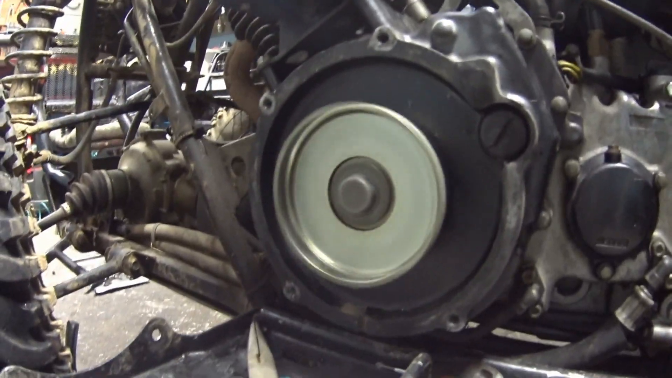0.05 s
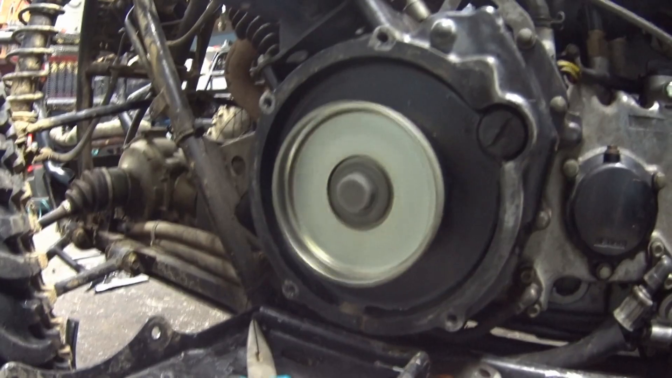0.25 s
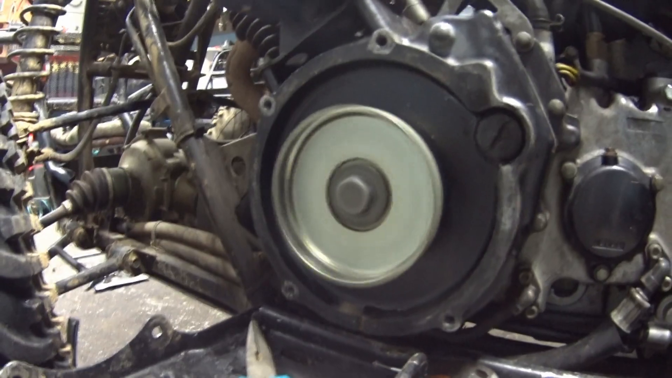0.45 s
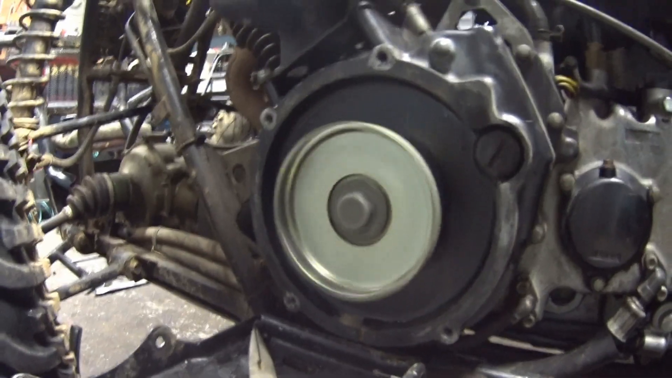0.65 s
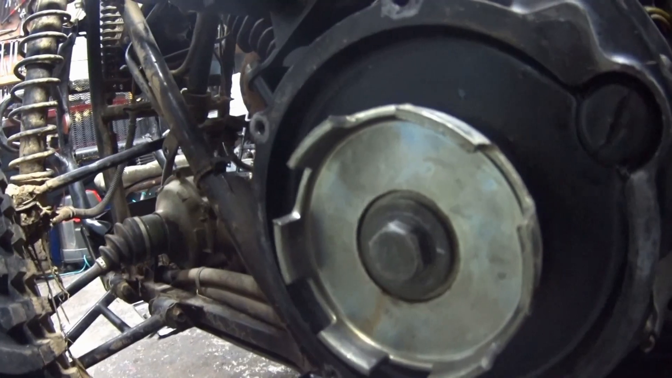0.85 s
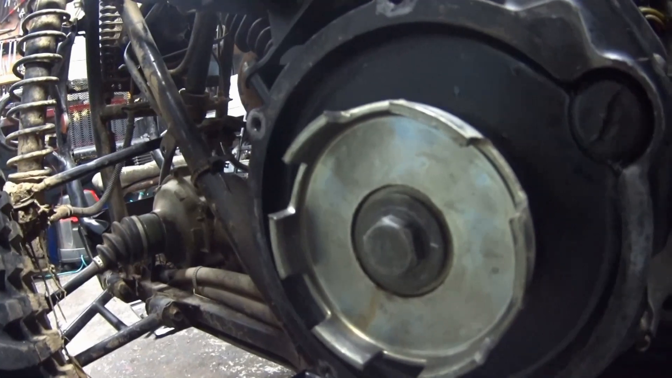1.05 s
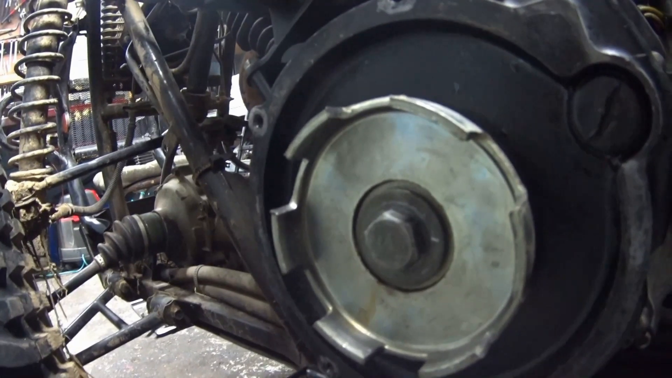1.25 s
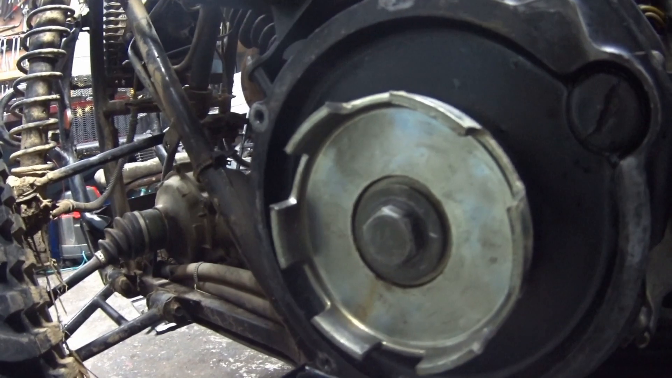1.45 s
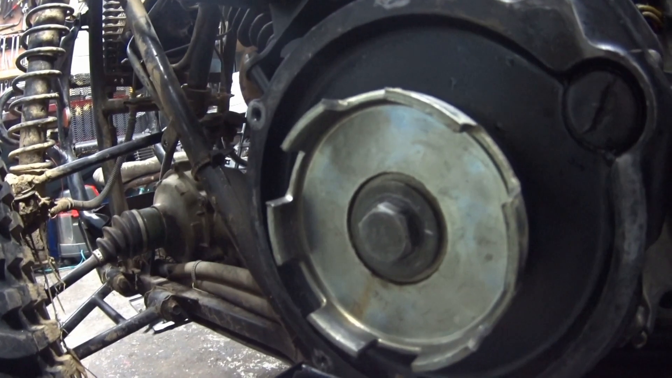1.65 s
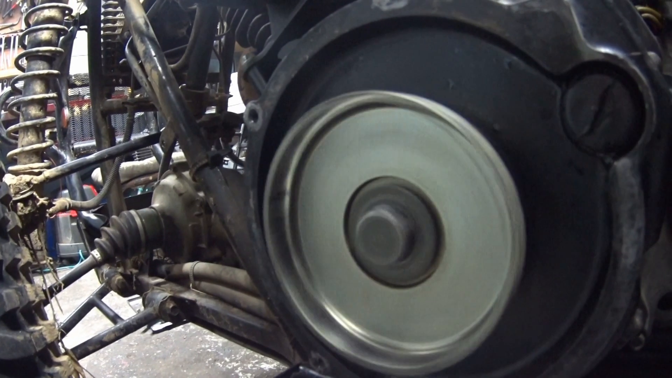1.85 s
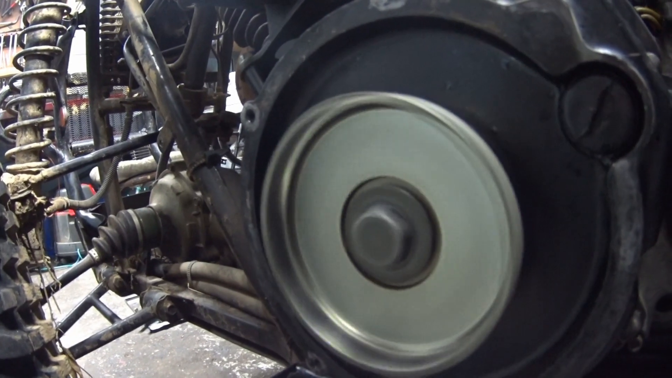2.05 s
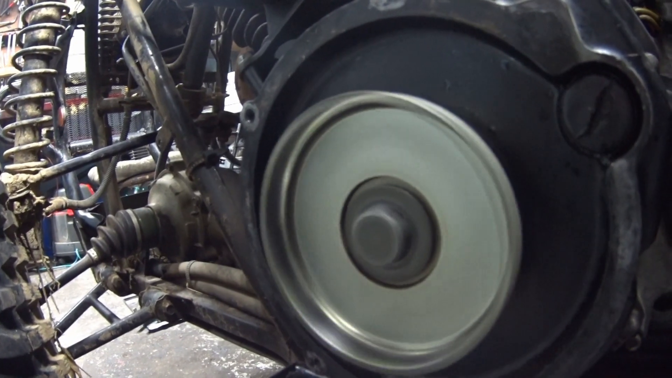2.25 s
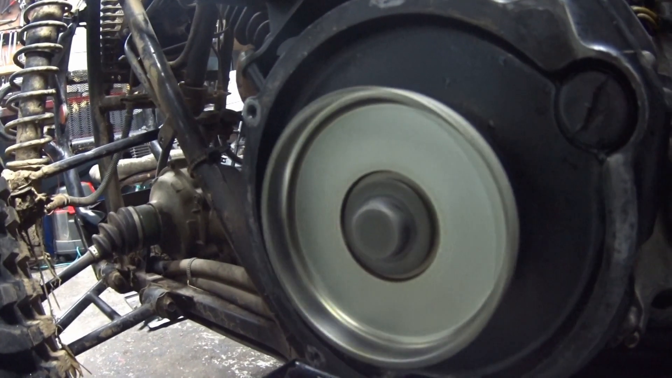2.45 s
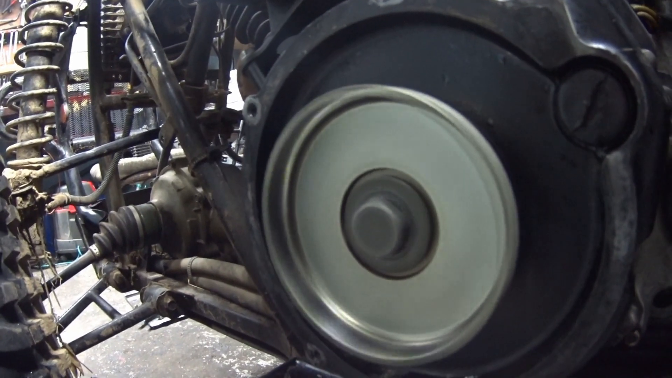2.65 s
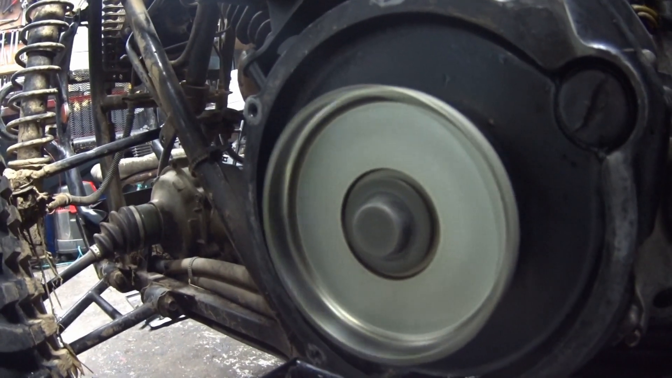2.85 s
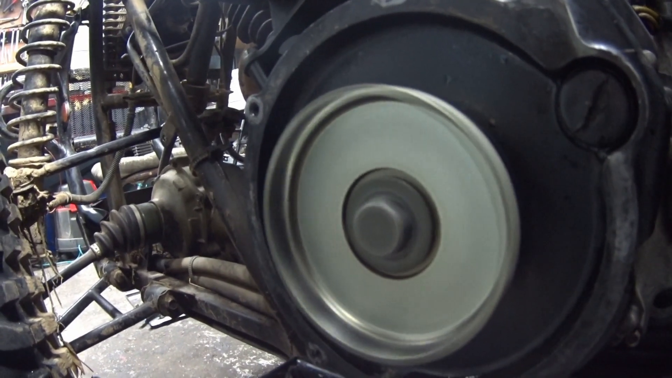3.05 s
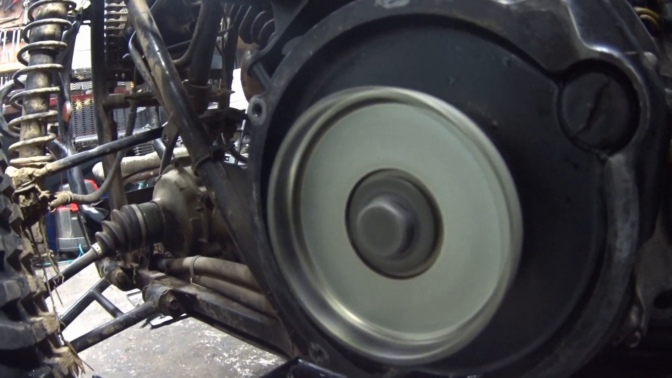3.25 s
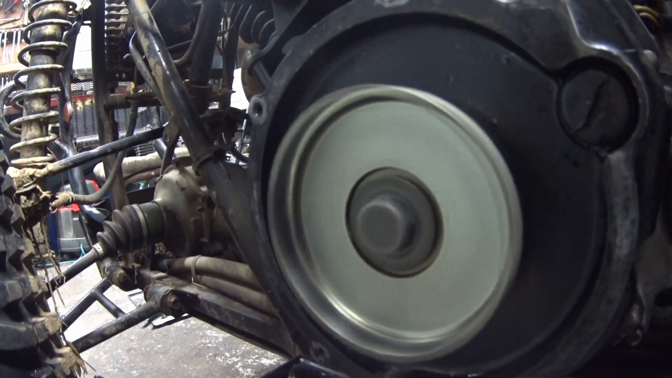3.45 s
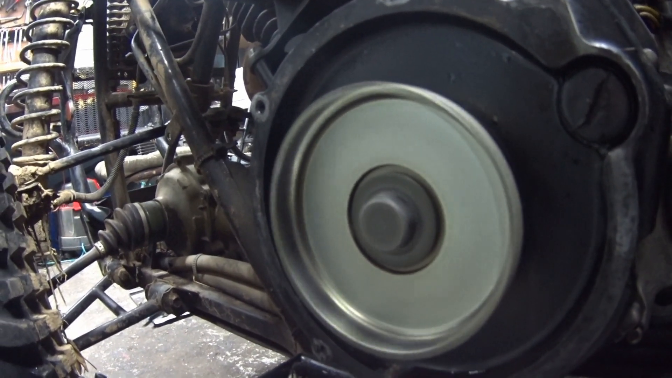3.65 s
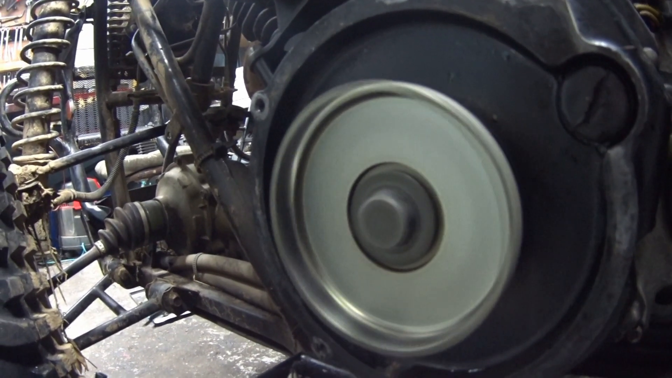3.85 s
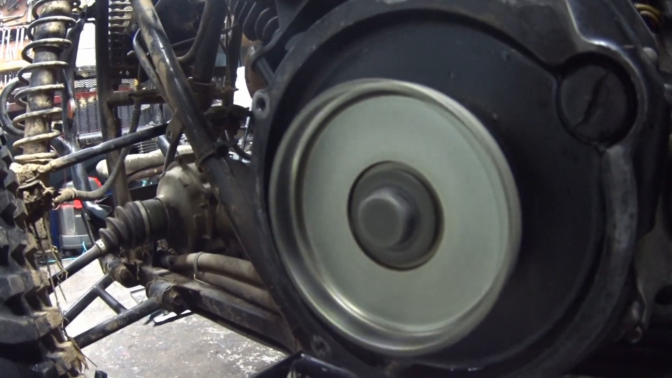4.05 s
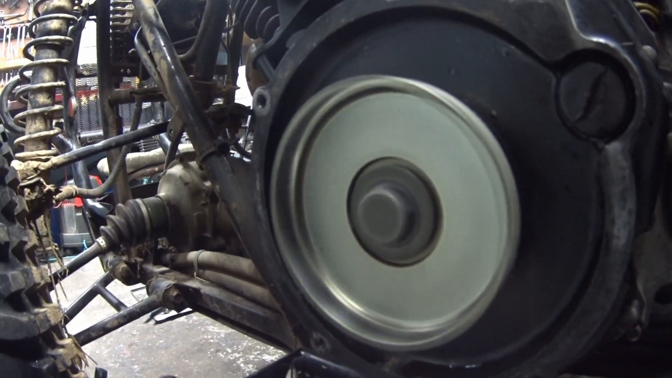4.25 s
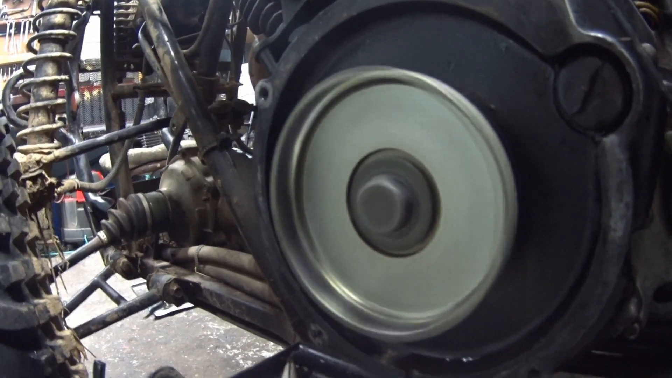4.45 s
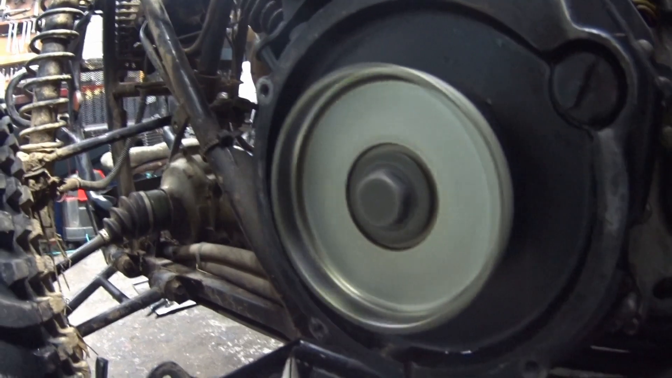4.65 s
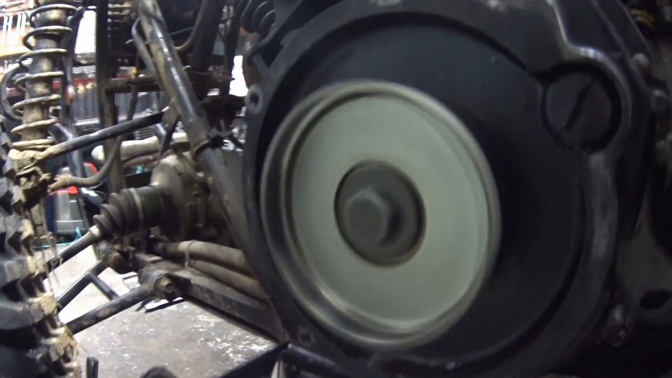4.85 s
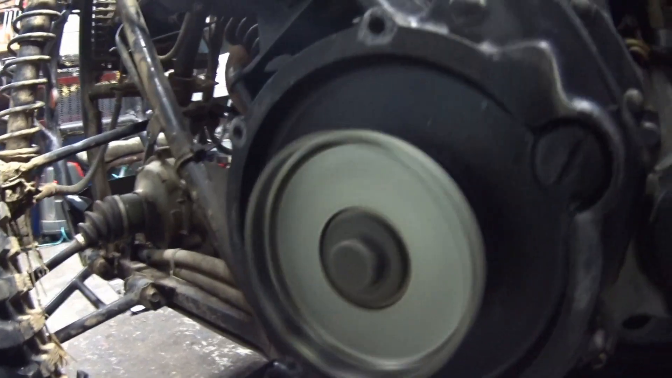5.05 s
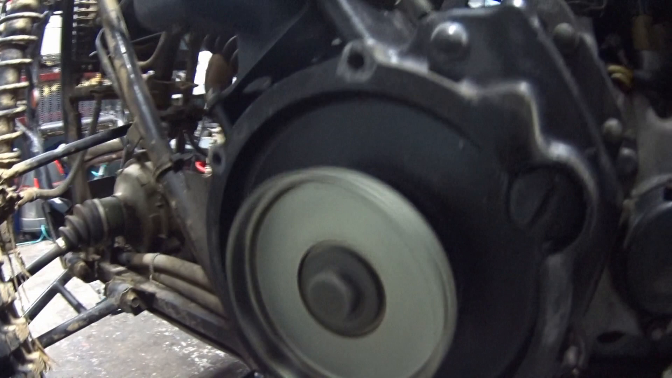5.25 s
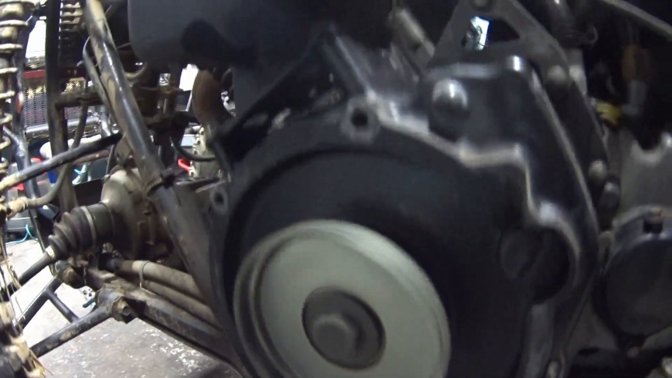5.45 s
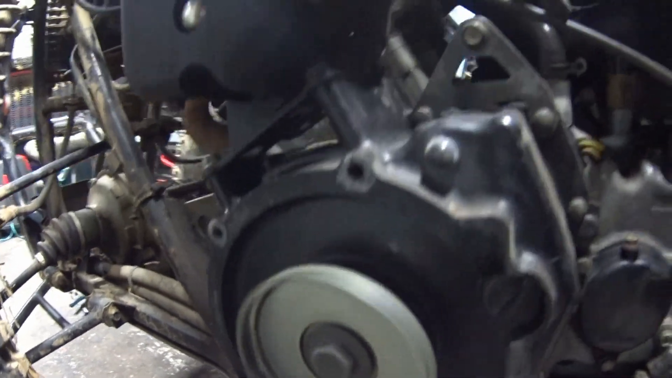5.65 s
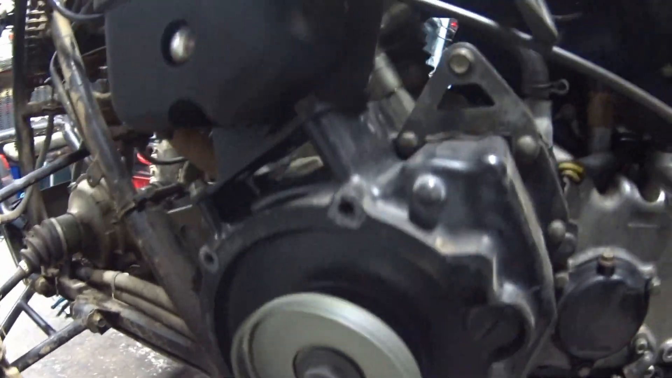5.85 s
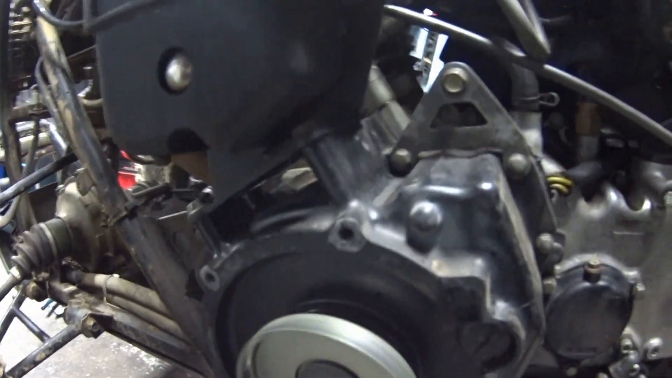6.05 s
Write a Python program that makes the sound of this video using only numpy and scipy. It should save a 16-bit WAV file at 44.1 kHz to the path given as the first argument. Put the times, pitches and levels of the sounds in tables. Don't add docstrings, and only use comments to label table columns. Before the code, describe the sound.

A single-cylinder engine idles in a garage, cuts out, clicks and wind, then a harsh starter grinds, the engine catches and clattering idle swells back.

```python
import sys
import numpy as np
from scipy import signal
from scipy.fft import rfft, irfft, next_fast_len
from scipy.io import wavfile
from scipy.ndimage import uniform_filter1d

SR = 44100
rng = np.random.default_rng(int(sys.argv[2]) if len(sys.argv) > 2 else 0)


def wav_out(sig):
    wavfile.write(sys.argv[1], SR, np.round(np.clip(np.atleast_2d(sig).T, -1, 1) * 32767).astype(np.int16))


def gain_from_db(level_db):
    decades = np.asarray(level_db, float) / 20
    return 10 ** decades


N = 269451
T = np.arange(N) / SR
HZ = np.fft.rfftfreq(next_fast_len(N), 1 / SR)

CUT_S, RESUME_S = .7395, .781
PULL_S, MESH_S, UNLOAD_S, RELEASE_S = 1.803, 1.817, 2.5, 3.155
# t/s, level/dB, sign
JUMPS = [
    (.98025, -24, 1),
    (1.78295, -20, -1),
]

# f/Hz, density/dB per Hz
AIR = [(150, -24), (250, -21), (302, -38), (349, -22.5), (679, -26), (783, -24), (1240, -28), (4420, -35),
       (4860, -35), (11100, -44.5), (14400, -85), (22000, -120)]
AIR_DB = -55
# t/s, level/dB
CLICKS = [
    (0.846, -25),
    (1.042, -36.5),
]
# f/Hz, level/dB, t60/s
CLICK_RINGS = [
    [(776, -20, 0.34), (1413, -5.5, 0.15), (2900, -11, .06), (3330, -4, 0.13), (5200, -18, 0.088),
     (6681, -12, 0.068), (7600, -8, 0.063), (8870, -16, .05)],
    [(1230, -2.5, 0.25), (1550, -6, 0.18), (1900, 2, 0.2), (2320, -1.5, 0.29), (3600, -7, 0.1),
     (4450, -8, 0.18), (5200, -14, 0.072), (8400, -11, 0.055)],
]

# f/Hz, density/dB per Hz
GUST = [(12, -42.5), (20, 0), (53, -1), (69, -2.5), (82, -6.5), (92, -6), (185, -25), (500, -30.5),
        (650, -90), (1100, -120)]
# t/s, level/dB, sign, size/s
EDDIES = [(0.8257, -16.5, -1, 0.0062), (0.853, -22, 0.83, 0.0076), (0.919, -17, -0.88, 0.0057),
          (1.065, -19.5, 0.96, .003), (1.142, -21, -0.87, 0.0017), (1.31, -28, -0.77, 0.005),
          (1.34, -20, 1, 0.0049), (1.4704, -8, -0.62, .0014), (1.474, -12, 0.87, 0.0036)]
# t/s, extra level/dB
PUFFS = [(1.035, 2), (1.3, 2), (1.41, 4.5), (1.475, 5.5), (1.655, 3), (1.765, 5)]
WIND_DB, SURGE_DB, SURGE_S, PUFF_S = -31.5, 5, .015, .022
DRIFT_S = .0012

# f/Hz, likeness
LIKENESS = [(60, .96), (170, .96), (480, .86), (1340, .85), (3770, .86), (10600, .86)]
# f/Hz, left lead/rad
LEAD = [(0, 0), (1030, 0.7), (2580, 0.3), (2840, -0.1), (3620, 0.6), (3960, 0.4), (7240, -0.0),
        (10800, -0.0)]
# f/Hz, left-right level/dB
LEAN = [(60, -3.5), (140, -1.5), (340, -7.5), (800, -4.5), (1890, -2), (4490, -1.0), (10600, 0)]

# f/Hz, density/dB per Hz
GRIND = [(320, -21), (550, -12.5), (1200, -4), (1360, -5.5), (1860, -3), (2080, -14), (2300, -8),
         (2650, -1.5), (2780, 0.5), (4540, -9.5), (5620, -11.5), (8400, -7), (11100, -22), (14400, -56.5),
         (22000, -120)]
# f/Hz, width/Hz, level/dB
HOUSING = [(1900, 320, 13), (2290, 170, 7.5), (2830, 42, -24.5), (3150, 140, 8.5), (3820, 160, 7.5),
           (5460, 45, -10), (7340, 130, -24.5), (8800, 250, -21)]
# t/s, peak level/dB, ring f/Hz, ring level/dB
SLIPS = [(1.9994, -28, 2270, -4), (2.4774, -6.5, 2500, -13), (2.531, -3.5, 2760, 3),
         (2.5894, 0.5, 1790, -12), (2.65, -1.5, 2760, -15), (2.6934, -9, 2750, -8),
         (2.725, -2.5, 2880, -24), (2.774, -2, 2800, -12), (2.8196, -3.5, 1640, 7), (2.8394, -10, 2840, 4),
         (2.892, -8, 2830, 7), (2.907, -7, 1913, 8.5), (2.941, -7.5, 3140, 3), (2.964, -7.5, 1900, 12),
         (2.9884, -3, 2820, -1), (3.032, -0.5, 2830, -12), (3.068, -5.5, 1940, -15), (3.086, -4, 2840, -13),
         (3.138, -15, 3870, -24), (3.1398, -10, 2840, -1), (3.187, -7.5, 2640, -55)]
# length/s, f/Hz, width/Hz, level/dB
LURCH = [
    (.13, 110, 160, -36),
    (.15, 480, 300, -31),
    (.023, 5600, 900, -24),
]
# t/s, length/s, start f/Hz, end f/Hz, level/dB
WHINES = [
    (1.84, .06, 780, 700, -26),
    (1.85, .11, 1450, 1950, -22),
    (1.97, .06, 2400, 2280, -21),
    (1.97, .06, 1250, 1180, -26),
    (3.09, .07, 1400, 1900, -26),
]
SQUEAKS = [(1.9, .03, 8200, 8100, -30), (1.96, .04, 9400, 8900, -32), (2.05, .08, 7300, 7250, -32),
           (2.96, .04, 7900, 8150, -35), (2.985, .03, 8600, 8600, -28), (3.06, .03, 8550, 8500, -27),
           (3.09, .04, 8600, 8600, -28), (3.08, .07, 7700, 7800, -33)]
HUMS = [
    (2.05, 1.12, 392, 392, -38),
    (2.98, .22, 7180, 7200, -37),
    (3.05, .36, 5230, 5190, -46),
]
WHINE_SHARE, SQUEAK_SHARE, HUM_SHARE, MIN_WIDTH_HZ = .055, .017, .004, 8
PULL_DB, GRIND_DB, UNLOAD_DB_PER_S, COAST_DB, COAST_DB_PER_S = -39, -15.5, -17.5, -32, -80

CUP_HZ, CUP_WIDTH_HZ = 2840, 28
WARM_CUP_DB, CUP_DB, CUP_AWAY_DB_PER_S = 7, 5.5, -2.5

# t/s, rate/firings per s
SPEED = [(2.05, 10.45), (2.33, 7.65), (2.84, 8.6), (2.98, 6.32), (3.08, 9.78), (3.43, 7.62), (3.75, 9.82),
         (3.84, 7.92), (4.11, 8.63), (4.41, 8.69), (4.9, 7.62), (4.97, 8.54), (5.47, 8.89), (5.5, 8.21),
         (5.81, 9.28), (6.1, 8.94)]
CATCH_S = SPEED[0][0]
WARM_START_S, WARM_PER_S = -.112, 8.6
# t/s, level/dB
GAIN = [
    (0, -18),
    (.74, -17.5),
    (2.03, -24.5),
    (3.2, -27.5),
    (3.6, -24.5),
    (4.7, -23),
    (5.6, -18.5),
    (6.11, -18),
]
BLOW_DB, DRAG_DB_PER_S, BOOM_DB, WARM_BOOM_DB = 4.5, -7, -11.5, -8
HANG_S, HANG_WIDTH_S = .026, .012

# f/Hz, density/dB per Hz
CASING = [(260, -2.5), (450, -3), (664, -2.5), (801, -1.5), (1090, -6.5), (1350, -4.5), (2220, -8),
          (2790, -2.5), (3150, -7.5), (3550, -10.5), (4050, -12.5), (5160, -18.5), (8030, -15.5),
          (11100, -26.5), (14400, -60), (22000, -120)]
# place/share of cycle, f/Hz, width/Hz, level/dB, t60/s
KNOCKS = [(-.22, 2510, 310, 7, 0.025), (-0.136, 8350, 3500, -6, 0.032), (-.13, 4840, 2700, -7.5, 0.0346),
          (.15, 7000, 4900, -5.5, 0.031), (.16, 3980, 1500, -8, 0.049), (0.118, 1290, 340, -6, 0.051),
          (.08, 2220, 1150, -6, 0.058), (-.14, 860, 730, -8, 0.064), (0.476, 4240, 840, -6.5, 0.067),
          (.48, 9140, 2000, -7.5, 0.046), (.47, 5900, 2520, -7.5, 0.037), (.64, 5100, 3000, -10, .03),
          (0.564, 813, 300, -2, 0.053), (.58, 1250, 470, -4, 0.054), (0.547, 1950, 1050, -2.5, 0.038),
          (0.624, 2280, 1370, -1.5, 0.05)]
# f/Hz, width/Hz, level/dB
COVER = [(1383, 38, -20), (1707, 210, -17.5), (7240, 28, -58.5), (7940, 350, -29)]
LIFT_DB, FREED_LIFT_DB, FREED_S = -1.23, 7.5, .4
LULL_PLACE, LULL_S, LULL_SHARE = .39, .0087, .3

# f/Hz, density/dB per Hz
FRAME = [(12, -40), (22, -2), (50, -3), (90, -3), (160, -6), (290, -9), (420, -15), (600, -19), (800, -45),
         (1300, -120)]
# delay/s, level/dB, rise/s, t60/s
PIPE = [(-.0165, 8.5, 0.019, 0.087), (-0.0117, -1.5, 0.0087, 0.13), (-.0125, -6.5, 0.0041, 0.086),
        (-.0125, -15.5, 0.012, 0.17), (.011, -5.5, 0.0053, 0.11), (.017, 2, 0.0047, 0.043),
        (-0.017, -16, 0.025, 0.14), (-0.018, -20, 0.0034, 0.1), (-.0125, -29, 0.0013, 0.086)]
AIRBOX = (0.0324, 7.4, 0.0086, 0.17)
PIPE_HZ = [163, 82, 327, 390, 245, 200, 53, 607, 719, 104]


def evened(x):
    return x / np.sqrt(np.mean(x ** 2) + 1e-20)


def noise(*shape):
    return rng.standard_normal(shape)


def read(points, hz):
    f, value = np.transpose(points)
    return np.interp(np.log(hz + 1), np.log(f + 1), value)


def curve(rows):
    return np.interp(T, *np.transpose(rows))


def bump(x):
    return np.exp(-.5 * x ** 2)


def shaped(x, gain):
    size = next_fast_len(N)
    return irfft(rfft(x, size) * gain, size)[:N]


def colour(x, points):
    return evened(shaped(x, gain_from_db(read(points, HZ))))


def resonate(x, hz, width_hz):
    r = np.exp(-np.pi * abs(width_hz) / SR)
    return evened(signal.lfilter([1, 0, -1], [1, -2 * r * np.cos(2 * np.pi * hz / SR), r * r], x))


def glide(x, hz, width_hz):
    turn = np.exp(2j * np.pi * np.cumsum(hz) / SR)
    r = np.exp(-np.pi * abs(width_hz) / SR)
    return evened((turn * signal.lfilter([1 - r], [1, -r], x / turn)).real)


def blows(times_s, db):
    at = np.round(np.asarray(times_s) * SR).astype(int)
    out = np.zeros(N + 2 * SR)
    np.add.at(out, at + SR, gain_from_db(db))
    return out


def play(train, shape):
    return signal.oaconvolve(train, shape)[SR:SR + N]


def fade(rise_s, t60_s):
    t = T[:SR // 3]
    return (1 - np.exp(-t / abs(rise_s))) * gain_from_db(-60 * t / abs(t60_s))


def grit(per_s, spread_db):
    size = gain_from_db(spread_db * np.minimum(rng.exponential(1, (2, N)), 5))
    size *= rng.random((2, N)) < per_s / SR
    return evened(size * rng.choice([-1., 1.], (2, N)))


def garage():
    a, b = noise(2, N)
    air = gain_from_db(AIR_DB) * np.array([colour(a, AIR), colour(.5 * a + .87 * b, AIR)])
    for (s, db), rings in zip(CLICKS, CLICK_RINGS):
        for hz, ring_db, t60_s in rings:
            train = blows([s, s + .05], [db + ring_db, db + ring_db - 19.5])
            gate = play(train, fade(.0038, t60_s)[:SR // 4])
            air += gate * np.array([resonate(x, hz, .03 * hz) for x in (a, .8 * a + .6 * b)])
        gate = play(blows([s], db - 9), fade(.003, .088))
        air += gate * np.array([resonate(x, 2500, 5000) for x in (b, .8 * b + .6 * a)])
    return air


def wind():
    a, b = (colour(x, GUST) for x in noise(2, N))
    db = WIND_DB + SURGE_DB * np.exp(-abs(T - RESUME_S) / SURGE_S)
    db += sum(puff_db * bump((T - s) / PUFF_S) for s, puff_db in PUFFS)
    level = gain_from_db(db) * np.interp(T, [1.8, 1.9], [1, .16])
    lumps = np.zeros(N)
    for s, eddy_db, sign, size_s in EDDIES:
        u = (T - s) / size_s
        lumps += sign * gain_from_db(eddy_db) * (1 - u ** 2) * bump(u)
    left = level * a + lumps
    later = np.roll(.96 * level * a + lumps, round(DRIFT_S * SR))
    return np.array([left, later + .33 * level * b]) * (T > CUT_S)


def cup(x):
    runs = evened(uniform_filter1d(noise(N), size=500))
    ring = resonate(x * gain_from_db(3.2 * np.clip(runs, -2, 2)), CUP_HZ, CUP_WIDTH_HZ)
    return np.array([ring, np.roll(ring, SR // 50)])


def grind_level():
    held = GRIND_DB + UNLOAD_DB_PER_S * np.maximum(T - UNLOAD_S, 0)
    coast = COAST_DB + COAST_DB_PER_S * (T - RELEASE_S)
    mesh = np.clip((T - MESH_S) / .003, 0, 1)
    free = np.clip((T - RELEASE_S) / .03, 0, 1)
    db = PULL_DB + mesh * (held - PULL_DB) + free * (coast - held)
    return gain_from_db(db) * np.clip((T - PULL_S) / .005, 0, 1)


def pitched():
    rows = [(MESH_S, length_s, hz, hz, width_hz, db) for length_s, hz, width_hz, db in LURCH]
    for table, share in [(WHINES, WHINE_SHARE), (SQUEAKS, SQUEAK_SHARE), (HUMS, HUM_SHARE)]:
        for s, length_s, hz0, hz1, db in table:
            rows.append((s, length_s, hz0, hz1, max(share * hz0, MIN_WIDTH_HZ), db))
    return rows


def starter(drive):
    slip_s, slip_db = np.transpose(SLIPS)[:2]
    level = np.hypot(grind_level(), play(blows(slip_s, slip_db - 8), fade(.0024, .091)))
    level *= gain_from_db(1.5 * evened(uniform_filter1d(noise(N), size=700)))
    swirl = [gain_from_db(4 * evened(uniform_filter1d(v, size=1500))) for v in noise(len(HOUSING), N)]
    out = []
    for x in drive:
        tones = sum(gain_from_db(db) * g * resonate(x, hz, w) for g, (hz, w, db) in zip(swirl, HOUSING))
        grind = level * (gain_from_db(-3.5) * colour(x, GRIND) + gain_from_db(-8) * evened(tones))
        for s, db, hz, ring_db in SLIPS:
            start = round(s * SR)
            span = slice(start, start + SR // 3)
            grind[span] += gain_from_db(db + ring_db - 20.5) * fade(.0044, .1) * resonate(x[span], hz, 100)
        for s, length_s, hz0, hz1, width_hz, db in pitched():
            end_s = s + length_s
            span = slice(round(s * SR), round(end_s * SR))
            hz = np.interp(T[span], [s, end_s], [hz0, hz1])
            grind[span] += gain_from_db(db) * signal.windows.tukey(len(hz), .3) * glide(x[span], hz, width_hz)
        out.append(grind)
    return out + gain_from_db(-37) * cup(out[0])


def firings():
    warm = np.arange(WARM_START_S, CUT_S, 1 / WARM_PER_S)
    turns = np.cumsum(curve(SPEED) * (T >= CATCH_S)) / SR
    caught = T[np.searchsorted(turns, np.arange(int(turns[-1]) + 1), "right")]
    s = np.append(warm, caught)
    drag_db = DRAG_DB_PER_S * (s - CATCH_S) * (s > MESH_S) * (s < RELEASE_S)
    blow_db = np.interp(s, *np.transpose(GAIN)) + BLOW_DB + drag_db
    return s, blow_db, blow_db + np.where(s < CUT_S, WARM_BOOM_DB, BOOM_DB)


def clatter(drive):
    s = firings()[0]
    s = np.append(s, s[-1] + .115)
    cycle_s = np.clip(np.diff(s, append=s[-1] + .11), .1, .135)
    jolts = noise(len(s), len(KNOCKS), 2) * [.002, 2.]

    dip = bump(T[:SR // 10] / LULL_S - 3)
    lull = 1 - LULL_SHARE * play(blows(s + LULL_PLACE * cycle_s - 3 * LULL_S, 0 * s), dip)
    out = gain_from_db(-6.5) * lull * np.array([colour(x, CASING) for x in drive])
    for k, (place, hz, width_hz, db, t60_s) in enumerate(KNOCKS):
        train = blows(s + place * cycle_s + jolts[:, k, 0], db + jolts[:, k, 1])
        gate = play(train, fade(.004, t60_s)[:SR // 10])
        out += gate * np.array([resonate(resonate(x, hz, width_hz), hz, 2 * width_hz) for x in drive])
    out += sum(gain_from_db(db) * np.array([resonate(x, hz, w) for x in out]) for hz, w, db in COVER)

    struck = .55 + play(blows(s + .61 * cycle_s, 3 + 2 * jolts[:, 0, 1]), fade(.003, .2))
    freed = np.exp(-abs(T - RELEASE_S) / FREED_S) * (T > RELEASE_S)
    lift = gain_from_db(LIFT_DB + FREED_LIFT_DB * freed) - 1
    out += lift * signal.sosfilt(signal.butter(2, 3600, "high", fs=SR, output="sos"), out)
    cup_db = np.where(T < CUT_S, WARM_CUP_DB, CUP_DB + CUP_AWAY_DB_PER_S * (T - RELEASE_S))
    level = gain_from_db(curve(GAIN)) * ((T < 1) | (T > 2.03))
    return level * (evened(out) + gain_from_db(cup_db - 14) * cup(out[0] * struck))


def exhaust():
    s, blow_db, boom_db = firings()
    t = T[:SR // 3]
    out = play(blows(s - .016, blow_db - 12), fade(.01, .42)) * colour(noise(N), FRAME)
    levels_db = [blow_db] * len(PIPE) + [boom_db]
    for hz, (delay_s, db, rise_s, t60_s), level_db in zip(PIPE_HZ, [*PIPE, AIRBOX], levels_db):
        late_s = .04 / hz * noise(len(s))
        train = blows(s + delay_s + late_s, level_db + db + noise(len(s)) + 6)
        out += play(train, fade(rise_s, t60_s) * np.sin(2 * np.pi * hz * t))
    return out


def ports(direct, diffuse):
    same = np.clip(read(LIKENESS, HZ), 0, 1)
    tilt = gain_from_db(read(LEAN, HZ) / 2) * np.exp(.5j * read(LEAD, HZ))
    right = shaped(direct, same / tilt) + shaped(diffuse, np.sqrt(1 - same ** 2) / tilt)
    return np.array([shaped(direct, tilt), right])


def scene():
    direct, diffuse = clatter(grit(12000, 2.5)) + starter(grit(12000, 2.5))
    pipe = exhaust()
    machine = ports(direct + pipe, diffuse + np.roll(pipe, 330)) * ((T < CUT_S) | (T > 1.8))
    lows = signal.sosfiltfilt(signal.butter(2, 600, fs=SR, output="sos"), machine)
    times_s = np.append(firings()[0], CATCH_S - HANG_S)
    hang = sum(bump((T - s + HANG_S) / HANG_WIDTH_S) for s in times_s if MESH_S < s < RELEASE_S)
    return garage() + wind() + machine - .8 * np.minimum(hang, 1) * lows


def band_limit(x):
    return signal.sosfilt(signal.butter(12, 11230, fs=SR, output="sos"), x)


def record(dry):
    before = np.clip((CUT_S - T) / .00044, 0, 1)
    after = np.clip((T - RESUME_S) / .008, 0, 1) ** 2
    jumps = sum(sign * gain_from_db(db) * np.sign(T - s) * np.exp(-abs(T - s) / .0077) / 2 for s, db, sign in JUMPS)
    rounded = .98 * np.tanh((dry * np.maximum(before, after) + jumps) / .95)
    mix = signal.oaconvolve(rounded, signal.firwin(301, 11150, fs=SR)[None], "same")
    return band_limit(mix)


dry = scene()
out = record(dry)
wav_out(out)
```